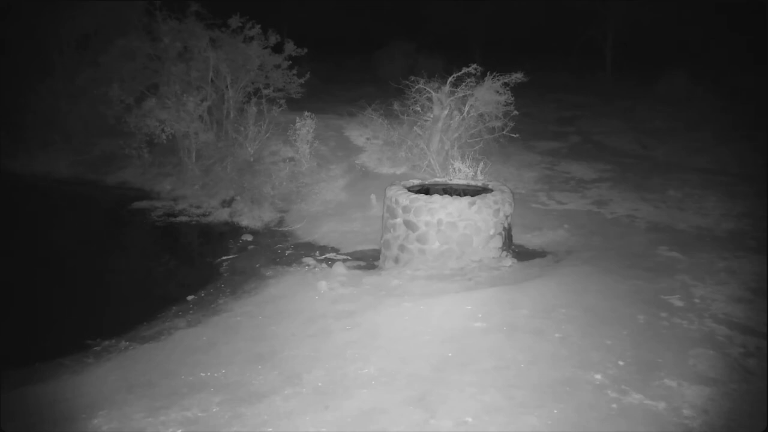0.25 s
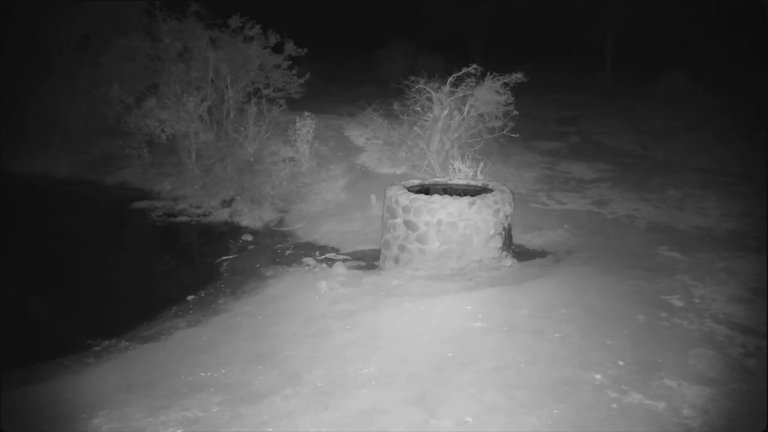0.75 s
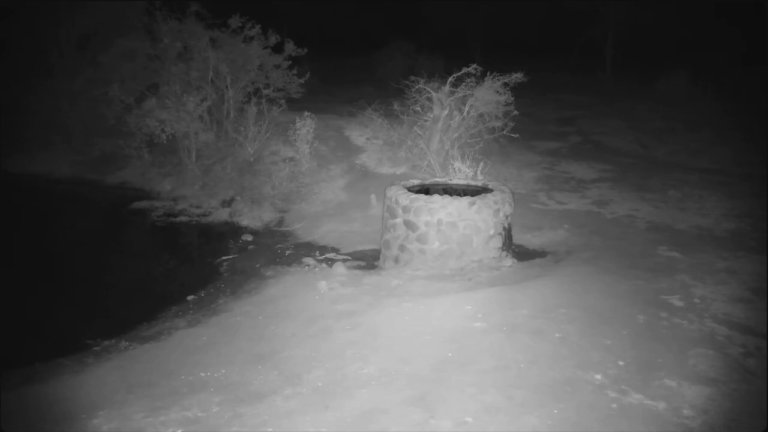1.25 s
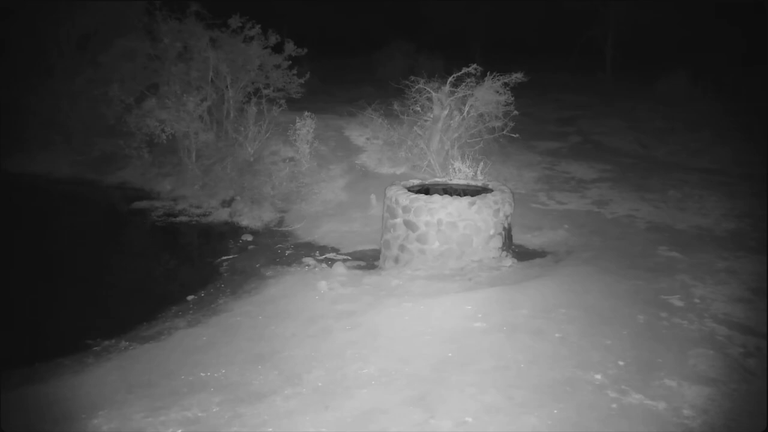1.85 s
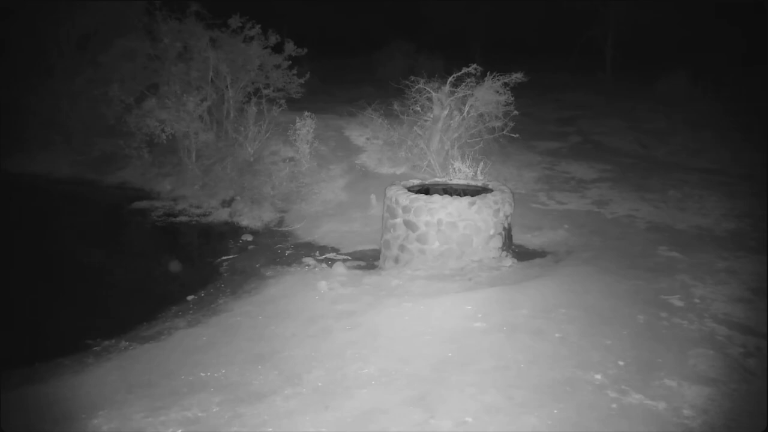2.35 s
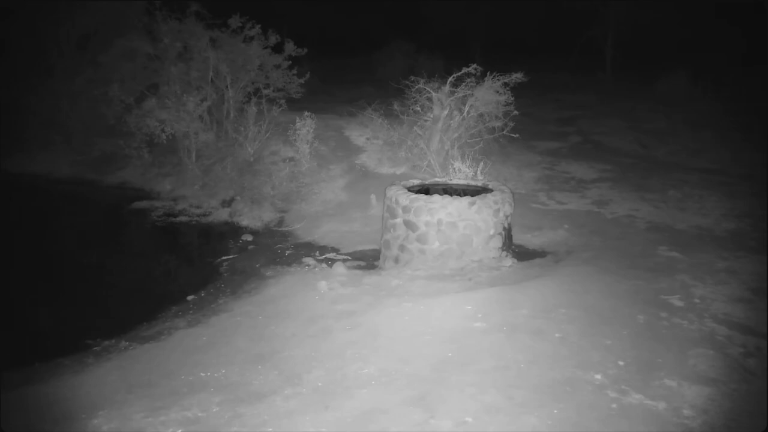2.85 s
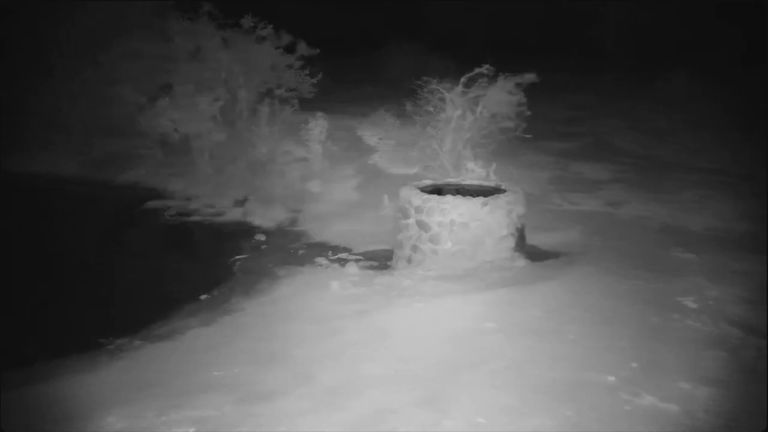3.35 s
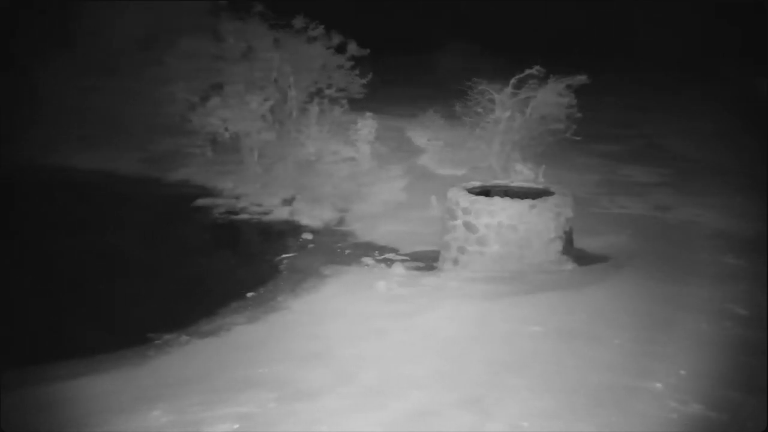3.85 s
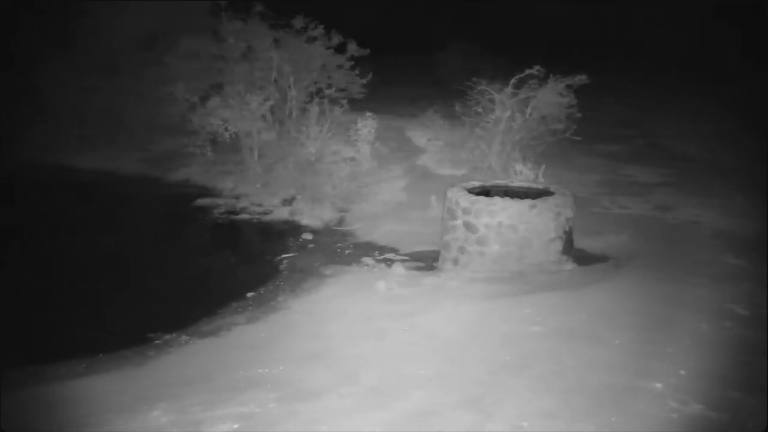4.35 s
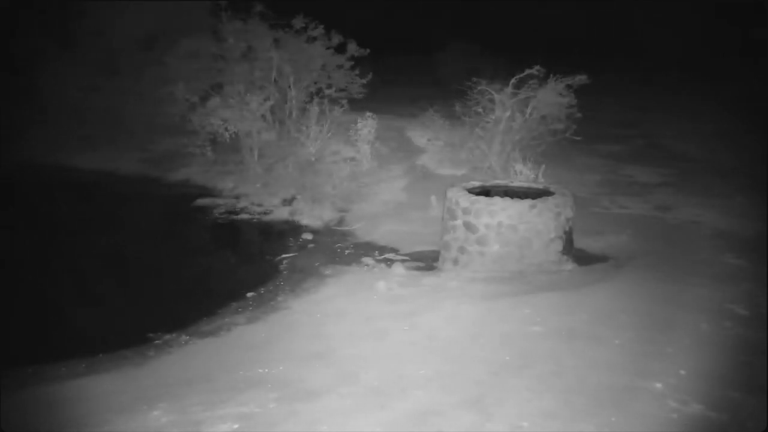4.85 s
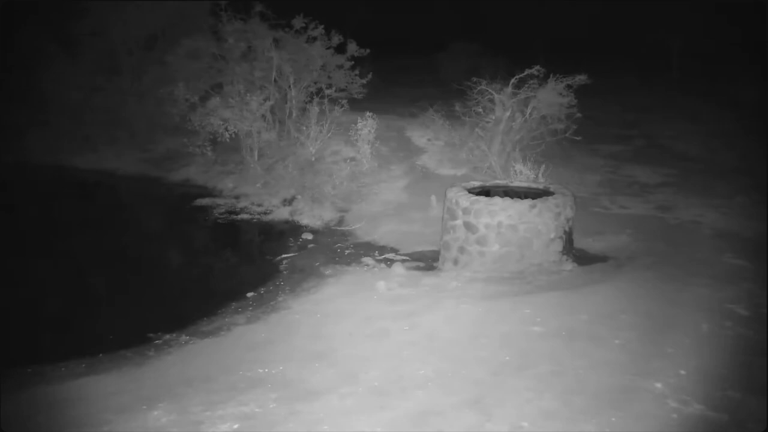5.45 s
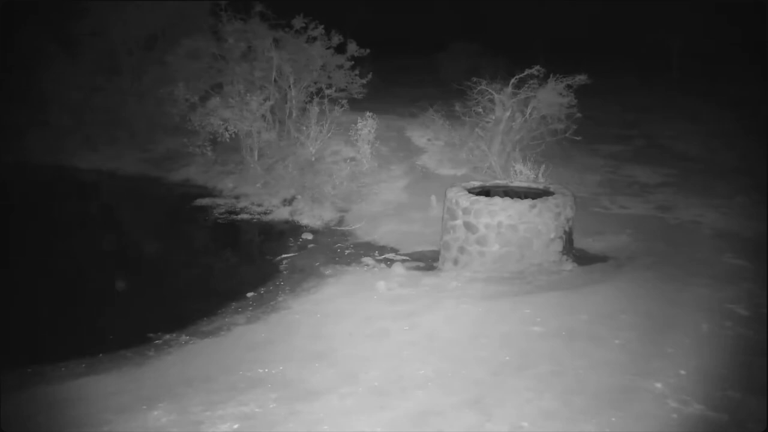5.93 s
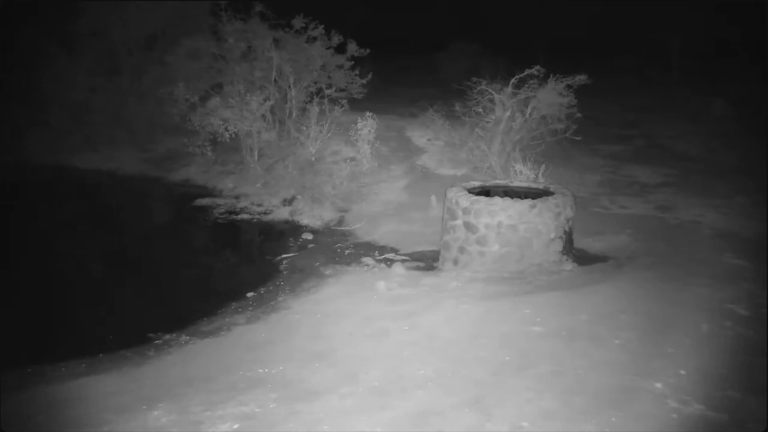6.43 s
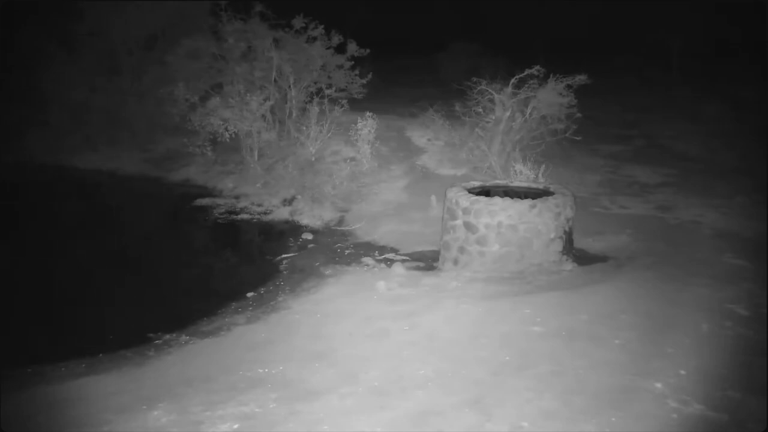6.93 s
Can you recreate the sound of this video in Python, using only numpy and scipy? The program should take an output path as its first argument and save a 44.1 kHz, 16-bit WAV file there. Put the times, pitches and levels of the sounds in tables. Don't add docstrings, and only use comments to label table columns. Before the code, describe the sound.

Two lions roar by turns at night in open bush, hoarse close grunts answered by smoother, farther moans, with faint hiss and small knocks.

```python
import sys
import numpy as np
from scipy import signal
from scipy.fft import rfft, irfft, next_fast_len
from scipy.io import wavfile
from scipy.ndimage import uniform_filter1d

SR = 44100
rng = np.random.default_rng(int(sys.argv[2]) if len(sys.argv) > 2 else 0)


def ratio_of_db(decibels):
    return 10 ** (np.asarray(decibels, float) / 20)


def digitize_waveform(pressure):
    field = np.atleast_2d(pressure).T
    bounded = np.clip(field, -1, 1)
    quanta = np.round(bounded * 32767).astype(np.int16)
    wavfile.write(sys.argv[1], SR, quanta)


N = 317079


def rms_one(x):
    return x / np.sqrt(np.mean(x ** 2) + 1e-20)


def evened(x, span_s):
    return x / np.sqrt(uniform_filter1d(x ** 2, int(span_s * SR)) + 1e-12)


def drift(rate_hz):
    r = np.exp(-2 * np.pi * rate_hz / SR)
    settle = 9000
    noise = rng.standard_normal(N + settle)
    return rms_one(signal.lfilter([1], [1, -2 * r, r * r], noise)[settle:])


def dying(x, decay_s):
    return signal.lfilter([1], [1, -np.exp(-1 / (decay_s * SR))], x)


def resonances(x, modes, patchy_db=0):
    out = 0
    for k, (hz, width_hz, db) in enumerate(modes):
        r = np.exp(-np.pi * width_hz / SR)
        section = [(1 - r * r) / 2, 0, (r * r - 1) / 2, 1, -2 * r * np.cos(2 * np.pi * hz / SR), r * r]
        gain = ratio_of_db(db + patchy_db * drift(8.5))
        out = out + (-1) ** k * gain * signal.sosfilt([section, section], x)
    return out


def stretched(coarse):
    return np.interp(np.arange(N) / 32, np.arange(len(coarse)), coarse)


# pitch_hz, level_db (per Hz)
NIGHT = [(15, -61.5), (25, -11), (69, -13.5), (113, 0.5), (163, 6.5), (296, -26.5), (485, -14.5),
         (538, -21), (735, -24), (1560, -18.5), (2020, -25), (11600, -26), (12500, -28.5), (16200, -73.5),
         (22000, -120)]


def night():
    hz = np.maximum(np.arange(N // 2 + 1) * SR / N, 1)
    shape_hz, shape_db = np.transpose(NIGHT)
    shape = np.interp(np.log(hz), np.log(shape_hz), shape_db)
    return ratio_of_db(-58) * rms_one(irfft(rfft(rng.standard_normal(N)) * ratio_of_db(shape), N))


# start_s, peak_db, rattle_db (over thud)
KNOCKS = [
    (1.307, -37.5, -15),
    (2.406, -39, -16.5),
    (2.448, -43.5, -16),
    (4.376, -55, -13),
    (4.4, -48.5, -27),
    (5.655, -40, -13),
    (5.692, -47, -12.5),
    (6.471, -49, -12),
    (6.672, -78, -8),
]
# pitch_hz, width_hz, level_db
BODY = [(235, 54, 4.5), (357, 17, -10), (514, 69, -12.5)]
# pitch_hz, width_hz, level_db
RATTLE = [(1380, 660, 1.5), (2520, 460, -3)]


def knocks():
    thud, shake = np.zeros(N) + 1e-18, np.zeros(N) + 1e-18
    for s, db, rattle_db in KNOCKS:
        thud[round(s * SR)] = ratio_of_db(db + 16.5)
        shake[round(s * SR)] = ratio_of_db(db + rattle_db + 8.5)
    rattle = dying(shake, decay_s=0.026) * rng.standard_normal(N)
    return ratio_of_db(26.5) * resonances(thud, BODY) + resonances(rattle, RATTLE)


def bush(x):
    t60_s, dulling_hz, low_hz = 0.61, 1100, 112
    size = next_fast_len(N + 2 * SR)
    hz = np.arange(size // 2 + 1) * SR / size
    t60 = t60_s / (1 + hz / dulling_hz)
    reply = 0
    for k, lag_s in enumerate(rng.uniform(.03, .075, 10)):
        turn = ratio_of_db(-60 * lag_s / t60) * np.exp(-2j * np.pi * hz * lag_s)
        reply = reply + (-1) ** k * turn / (1 - turn)
    bass_cut = hz ** 2 / (hz ** 2 + low_hz ** 2)
    return irfft(rfft(x, size) * reply * bass_cut, size)[:N]


def effort(pushes, release_db_per_s):
    start, attack, hold, db, droop = np.transpose(pushes)[..., None]
    t = np.arange(0, N + 32, 32) / SR - start - attack
    rising = 25 * np.minimum(t / attack, 0)
    drooping = droop * np.clip(t, 0, hold)
    releasing = release_db_per_s * np.maximum(t - hold, 0)
    level_db = db + rising - drooping - releasing
    return stretched(np.maximum(level_db.max(axis=0), -140))


def pitch(arches, rise_hz_per_s):
    t = np.arange(N) / SR
    hz = np.full(N, 84.1)
    for s, top_hz, plateau_s, sag in arches:
        climb = rise_hz_per_s * np.minimum(t - s, 0)
        hz = np.maximum(hz, top_hz + climb - sag * np.maximum(t - s - plateau_s, 0))
    return hz


def bells(rows):
    s, db, rise = np.transpose(rows)[..., None]
    t = np.arange(0, N + 32, 32) / SR - s
    width = rise * np.where(t > 0, 1.37, 1)
    return stretched(np.sum(ratio_of_db(db) * np.exp(-(t / width) ** 2), axis=0))


# pitch_hz, width_hz, level_db
CHEST = [(62, 43, -22), (136.2, 38, -1.5), (174.2, 52.4, -3.5), (190.2, 62, -6)]
UPPER_THROAT = [(465, 140, -6.5), (548, 46.4, 3.5), (600, 130, -9)]
HOUSING = [(987, 470, -5), (1325, 117, 4), (1600, 293, 2), (2042, 300, -10), (2310, 435, -5),
           (2727, 550, -13)]
TEETH = [(3420, 1000, 6.5), (4910, 900, -13.5), (5840, 1500, -5.5)]


def voice(hz, tone_db, throat_db, upper_db, chest_db, mouth_db, hiss_db, throat_modes, rough, flutter_db):
    wobble = drift(30)
    tone = np.sqrt(2) * np.cos(2 * np.pi * np.cumsum(hz * (1 + 0.0097 * wobble)) / SR)
    cycles = np.cumsum(hz * (1 + .022 * wobble)) / SR
    closing = np.diff(np.floor(cycles), prepend=0) > 0
    weak = np.where(np.floor(cycles) % 2, .1, 1)
    pulses = rms_one(closing * weak * ratio_of_db(2.0 * rng.standard_normal(N)))
    gust = .85 + weak * np.exp(-3.0 * (cycles % 1))
    breath = rms_one(rng.standard_normal(N) * gust)
    folds = np.sqrt(1 - rough) * pulses + np.sqrt(rough) * breath
    puffs = breath * ratio_of_db(flutter_db * drift(33))
    chest = evened(resonances(breath, CHEST), 0.2) * ratio_of_db(throat_db + chest_db)
    throat = evened(resonances(folds, throat_modes, patchy_db=2.2), .06) * ratio_of_db(throat_db)
    upper = evened(resonances(folds, UPPER_THROAT), 0.18) * ratio_of_db(throat_db + upper_db)
    mouth = evened(resonances(puffs, HOUSING, patchy_db=1.6), .06) * ratio_of_db(mouth_db)
    hiss = evened(resonances(puffs, TEETH, patchy_db=1.5), 0.08) * ratio_of_db(mouth_db + hiss_db)
    return tone * ratio_of_db(tone_db - 1.0) + chest + throat + upper + mouth + hiss


# start_s, attack_s, hold_s, tone_db, droop_db_per_s
MOANS = [(-.1, 0.057, 0.36, -27, 8.5), (.755, 0.018, 0.051, -21.5, -3), (1.07, 0.015, 0.29, -49.5, 17),
         (1.4, 0.088, 0.046, -32, -57.5), (1.5, 0.036, 0.37, -27, 6.5), (1.84, .05, 0.42, -21, 68.5),
         (3.075, 0.043, .38, -34, -1.5), (3.5, 0.019, 0.05, -38.5, 31), (4.02, .03, 0.39, -53, 18.5),
         (4.92, 0.034, 0.32, -35.5, 3.5), (6.5, .06, 0.15, -63.5, 13)]
# top_reached_s, top_hz, plateau_s, sag_hz_per_s
MOAN_ARCHES = [
    (-.02, 189, .04, 114),
    (.79, 160, .11, 51.55),
    (1.1, 156, .21, 99.6),
    (1.6, 196.3, .08, 138.8),
    (3.16, 152.7, .12, 61.4),
    (4.02, 141.1, .11, 50.37),
    (4.95, 136.4, .21, 137.2),
    (6.55, 159.6, .55, 98.4),
]
# pitch_hz, width_hz, level_db
FAR_THROAT = [(213, 86, 5.5), (257, 140, -8.5), (372, 96, -5), (676, 180, -15)]
# throat_db (over tone), upper_throat_db, chest_db (over throat),
# mouth_db (over tone), hiss_db (over mouth)
FAR_RASP = (-19, -21.5, 7.5, -33.5, -21.5)


def far_lion():
    tone_db = effort(MOANS, release_db_per_s=220) + 0.5 * drift(13)
    throat_db, upper_db, chest_db, mouth_db, hiss_db = FAR_RASP
    hz = pitch(MOAN_ARCHES, rise_hz_per_s=320)
    return voice(hz, tone_db, tone_db + throat_db, upper_db, chest_db, tone_db + mouth_db, hiss_db,
                 FAR_THROAT, rough=.6, flutter_db=3.5)


# start_s, attack_s, hold_s, throat_db, droop_db_per_s
GRUNTS = [(-.1, 0.028, 0.064, -34, 9.5), (.335, 0.019, 0.48, -32.5, 7.5), (.80, .022, 0.16, -36, 61.5),
          (1.505, 0.019, 0.38, -34, 12), (1.9, 0.029, 0.24, -46.5, -14.5), (2.572, 0.016, 0.024, -42, -150),
          (2.6, .018, 0.37, -31.5, 21.5), (3.615, 0.02, .26, -32.5, 29), (4.47, .022, .05, -52.5, -92),
          (4.51, 0.043, .03, -36, 62), (4.6, 0.031, 0.25, -31.5, 13.5), (5.305, 0.028, 0.11, -45, -90),
          (5.8, .022, .33, -32.5, 19), (6.15, .022, 0.088, -39.5, 12), (7.1, 0.02, 0.17, -46, -36.5)]
# top_reached_s, top_hz, plateau_s, sag_hz_per_s
GRUNT_ARCHES = [(-.06, 162.5, 0.049, 363), (.43, 167, 0.15, 95.7), (1.6, 161.8, 0.048, 170.3),
                (2.0, 129.7, 0.055, 59.2), (2.675, 163.4, 0.082, 170.2), (3.7, 154, 0.071, 300.3),
                (4.57, 161.4, 0.087, 169.7), (5.385, 154, .022, 283.3), (5.87, 155.3, 0.054, 169.9),
                (6.26, 123.2, 0.036, 185), (7.18, 165.9, 0.044, 199)]
# peak_s, peak_db, rise_s
SWELLS = [(.035, -28, 0.019), (0.408, -18, 0.029), (0.461, -14.5, 0.039), (0.529, -18, 0.04),
          (.605, -20.5, 0.012), (.68, -19, 0.038), (.755, -24.5, .03), (.935, -31.5, 0.044),
          (1.01, -41, 0.012), (1.62, -14.5, .045), (1.785, -23.5, 0.061), (2.0, -64, .04),
          (2.14, -37, 0.056), (2.684, -14, 0.033), (2.785, -22, 0.03), (2.865, -21, 0.018),
          (2.946, -22.5, 0.021), (3.015, -36, .03), (3.728, -13, 0.027), (3.827, -21, .025),
          (3.9, -30.5, 0.029), (4.558, -26, 0.029), (4.68, -12.5, 0.034), (4.79, -26, 0.053),
          (4.88, -25, 0.024), (5.395, -24.5, 0.028), (5.912, -12.5, 0.037), (6.045, -27, 0.032),
          (6.125, -38, 0.054), (6.26, -33, 0.028)]
# start_s, peak_db
CATCHES = [(0.3543, -50), (0.3805, -36.5), (0.492, -32), (0.565, -42.5), (0.728, -36), (0.7992, -39),
           (1.5205, -49), (1.576, -32.5), (2.1, -46), (2.5884, -43), (2.6136, -42), (2.8695, -27),
           (3.6318, -56), (3.7249, -22), (3.801, -21.5), (3.898, -34.5), (4.4815, -48), (4.6423, -32),
           (4.7447, -25.5), (5.3307, -77), (5.4223, -51), (5.8188, -36), (5.8691, -20.5), (5.9715, -21),
           (6.0471, -28.5), (6.105, -42), (6.1682, -33), (6.215, -50), (6.262, -45), (7.1197, -50)]
# start_s, attack_s, hold_s, level_db (over mouth), droop_db_per_s
GAPES = [
    (.36, 0.062, 0.36, 0.5, 4),
    (1.54, 0.029, 0.17, 3, 1),
    (2.6, 0.033, .18, 1.5, -3.5),
    (3.64, 0.034, 0.17, 2.5, 8),
    (4.62, 0.017, 0.27, 2.5, 2),
    (5.86, .04, 0.2, 1.5, -2.5),
    (7.1, 0.031, .11, 3.5, -2.5),
]
# start_s, attack_s, hold_s, level_db (over mouth), droop_db_per_s
SNARLS = [
    (-.05, .04, .15, -14.5, 1),
    (.42, 0.045, 0.3, -19, 4),
    (.74, 0.049, .25, -13, -3),
    (1.56, 0.075, 0.6, -18.5, -5),
    (2.63, 0.056, 0.56, -17.5, 1),
    (3.66, 0.048, 0.2, -18.5, 9),
    (4.62, .06, 0.42, -19.5, -1.5),
    (5.37, 0.028, 0.14, -17, 13.5),
    (5.87, 0.049, 0.42, -18, -1),
]
# peak_s, peak_db, rise_s
HEAVES = [(.015, -28.5, 0.024), (.385, -29.5, 0.019), (.79, -26.5, 0.025), (2.0, -42.5, 0.063),
          (2.88, -27, .035), (3.69, -22, 0.022), (3.815, -24, 0.02), (4.55, -30, 0.029), (4.91, -35, 0.028),
          (5.46, -49.5, 0.029), (6.19, -28, .025), (6.475, -46, 0.014), (7.16, -33.5, 0.025)]
# pitch_hz, width_hz, level_db
THROAT = [(243, 65, -1), (330, 110, -10), (403, 70, 0)]


def puffs_and_choke():
    release = np.zeros(N) + 1e-18
    for s, db in CATCHES:
        release[round(s * SR)] = ratio_of_db(db - 20.5)
    puffs = uniform_filter1d(dying(release, decay_s=0.04), size=180, origin=89)
    backwards = (release > 1e-9)[::-1] + 1e-18
    choke = dying(backwards, decay_s=0.042)[::-1]
    return puffs, uniform_filter1d(choke, size=130)


def near_lion():
    slack_hiss_db, shut_db, shutting_db_per_s = -20.5, -5, 122
    push_db = effort(GRUNTS, release_db_per_s=165.5)
    puffs, choke = puffs_and_choke()
    choked_db = push_db - 2.5 * choke
    hiss_db = np.maximum(effort(SNARLS, shutting_db_per_s), slack_hiss_db)
    gape_db = np.maximum(effort(GAPES, shutting_db_per_s), shut_db)

    opening_db = 0.44 * gape_db + 0.12 * (hiss_db - slack_hiss_db)
    mouth_db = 20 * np.log10(ratio_of_db(choked_db - 8.5 + opening_db) + puffs)

    swells = bells(SWELLS) * ratio_of_db(0.95 * (choked_db - push_db))
    tone_db = 20 * np.log10(ratio_of_db(choked_db - 6) + swells)

    throat = ratio_of_db(choked_db) + ratio_of_db(-9.5) * puffs + ratio_of_db(tone_db - 31)
    throat_db = 20 * np.log10(throat) - 0.25 * (gape_db - shut_db)
    upper_db = mouth_db - throat_db + gape_db

    easing_db = np.clip(-33 - push_db, 0, 18)
    boom = ratio_of_db(push_db - 0.5 + 0.49 * easing_db) + bells(HEAVES)
    chest_db = 20 * np.log10(boom) - throat_db
    hz = pitch(GRUNT_ARCHES, rise_hz_per_s=350) - 0.57 * easing_db
    return voice(hz, tone_db, throat_db, upper_db, chest_db, mouth_db, hiss_db,
                 THROAT, rough=.38, flutter_db=1.5)


def scene():
    lions = far_lion() + near_lion()
    echo = ratio_of_db(-19.5) * bush(lions)
    return (night() + knocks() + echo + lions)[None]


def roll_off(x):
    return signal.sosfilt(signal.butter(12, 13220, fs=SR, output="sos"), x)


def record(dry):
    steep = signal.ellip(12, .5, 80, 12200, fs=SR, output="sos")
    mix = signal.sosfilt(steep, dry)
    return roll_off(mix)


dry = scene()
out = record(dry)
digitize_waveform(out)
```